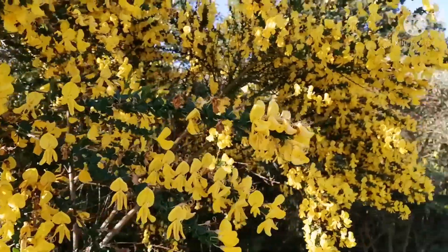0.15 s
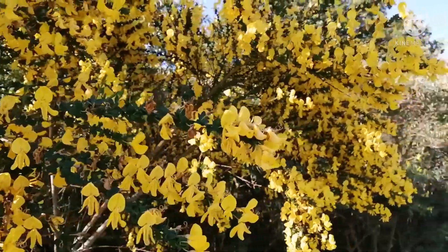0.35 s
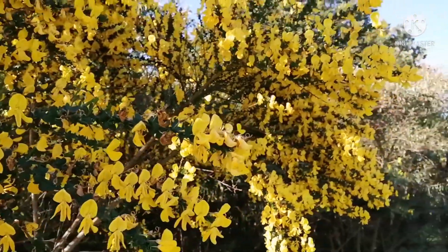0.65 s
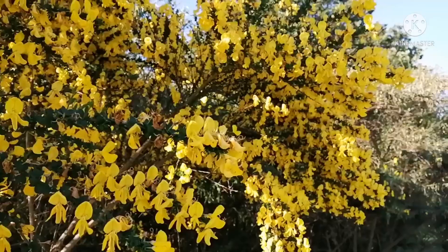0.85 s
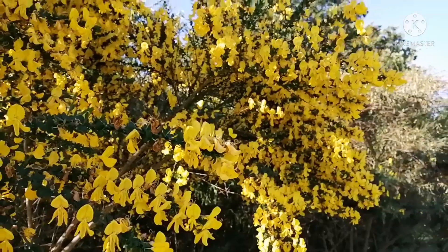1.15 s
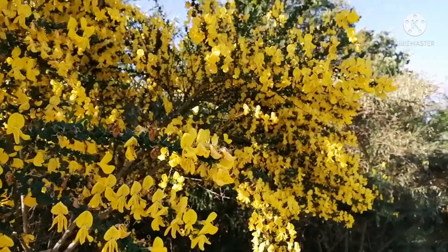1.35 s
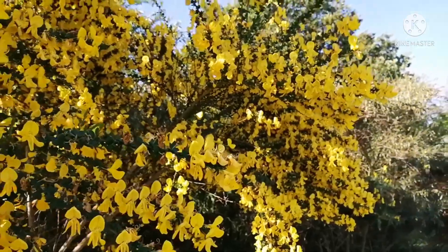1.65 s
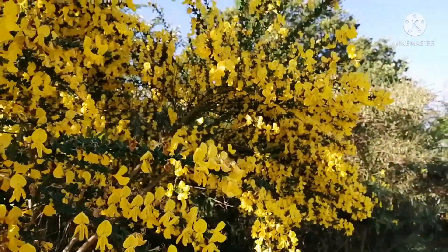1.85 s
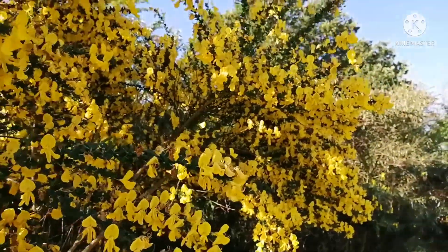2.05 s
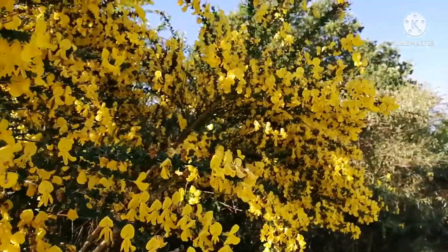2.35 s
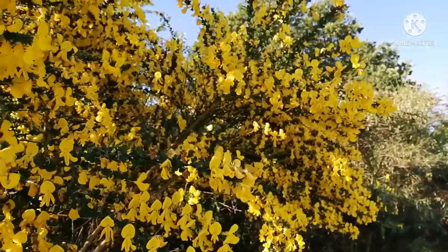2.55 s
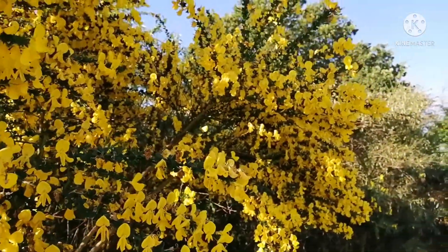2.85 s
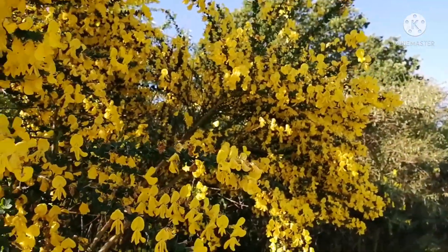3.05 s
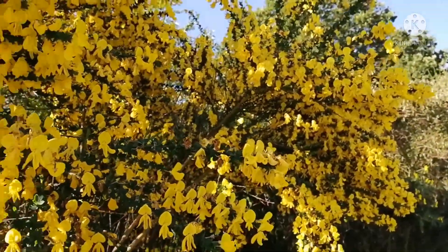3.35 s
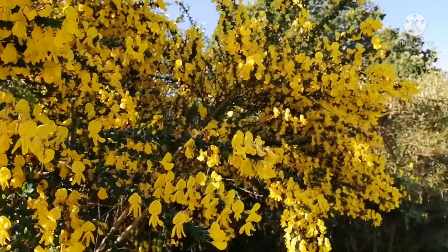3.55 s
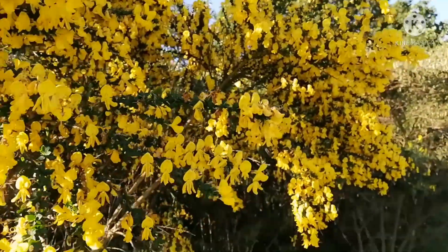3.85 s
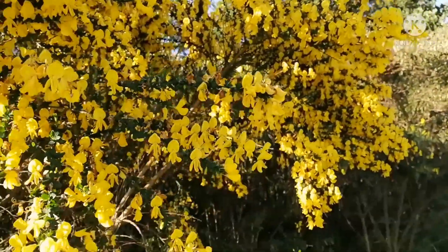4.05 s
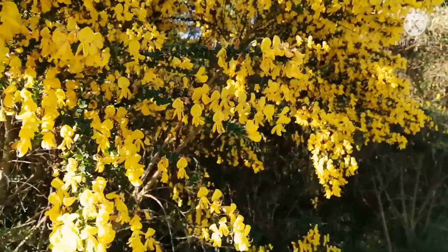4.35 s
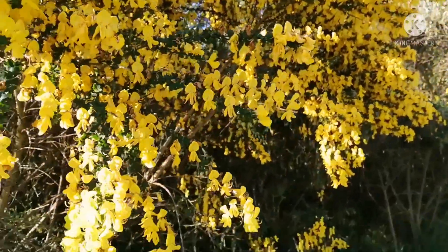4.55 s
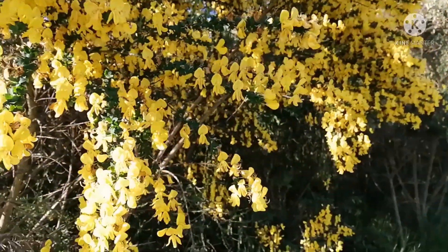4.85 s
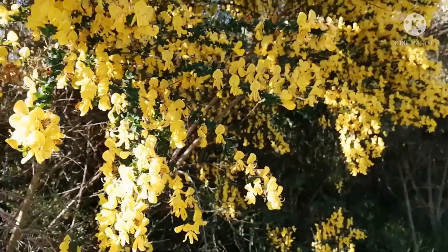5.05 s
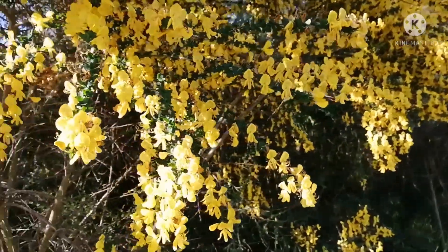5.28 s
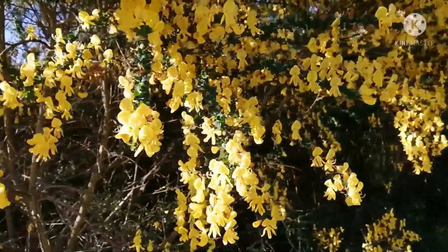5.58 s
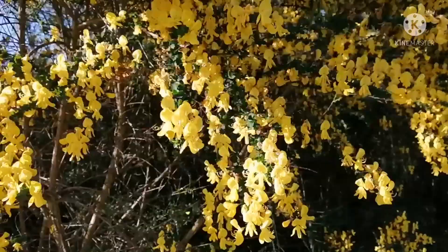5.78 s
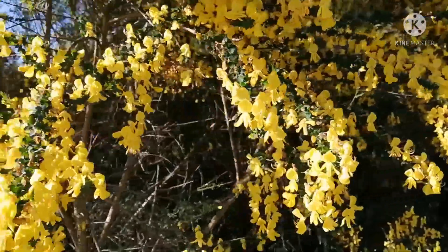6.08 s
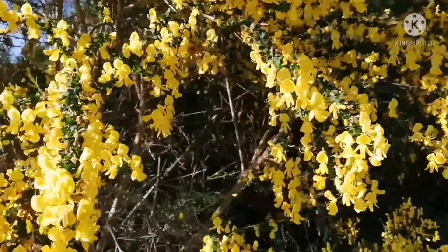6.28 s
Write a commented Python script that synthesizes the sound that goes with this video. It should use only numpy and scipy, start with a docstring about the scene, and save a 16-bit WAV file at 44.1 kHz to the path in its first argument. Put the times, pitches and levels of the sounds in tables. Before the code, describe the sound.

Near a flowering shrub, a bumblebee's smooth low drone surges and dips above distant machinery and traffic wash, with thin bird whistles and tiny twig ticks.

```python
"""Bee among flowering shrubs

A large bee's near-sine wingbeat hum swells, fades and slowly sinks. Wandering low tones and
shaped noise make far machinery, traffic, breeze and leaves. Small birds whistle in gliding sines
and rasp in trilled noise, also repeating a thin high note; a damped sine ticks as a twig thrice."""
import sys
import numpy as np
from scipy import signal
from scipy.fft import rfft, irfft
from scipy.io import wavfile

SR = 44100
rng = np.random.default_rng(int(sys.argv[2]) if len(sys.argv) > 2 else 0)


def transcribe(signal):
    """Save signal, clipped to [-1, 1], as a 16-bit WAV file at the path in sys.argv[1]."""
    frames = np.atleast_2d(signal).T
    limited = np.clip(frames, -1, 1)
    pcm = np.round(limited * 32767).astype(np.int16)
    wavfile.write(sys.argv[1], SR, pcm)


N = 283122
TIME = np.arange(N) / SR  # s


def gain_of(db):
    """Decibels to amplitude."""
    return 10 ** (np.asarray(db) / 20)


def evened(x):
    """Scales to rms 1."""
    return x / np.sqrt(np.mean(x ** 2) + 1e-20)


def curve(rows):
    """Joins (s, value) rows by straight lines."""
    return np.interp(TIME, *np.transpose(rows))


def progress(length_s):
    """Runs from 0 to 1 over a note."""
    return np.linspace(0, 1, int(length_s * SR))


def add(mix, start_s, sound):
    """Mixes a sound in at a start time."""
    part = mix[max(round(start_s * SR), 0):][:len(sound)]
    part += sound[:len(part)]


def noise(spectrum):
    """Noise of rms 1 with a (Hz, dB) spectrum, interpolated over log frequency."""
    hz, db = np.transpose(spectrum)
    bins_hz = np.fft.rfftfreq(N, 1 / SR)
    shape_db = np.interp(np.log(bins_hz + 1), np.log(hz + 1), db)
    white = rng.standard_normal(N)
    return evened(irfft(rfft(white) * gain_of(shape_db), N))


def drift(rate_hz):
    """Smooth chance of rms 1, no faster than about the given rate."""
    coarse = rng.standard_normal(4096)
    t = np.linspace(0, N / SR, len(coarse))
    bins_hz = np.fft.rfftfreq(len(t), t[1])
    smooth = irfft(rfft(coarse) * np.exp(-(bins_hz / rate_hz) ** 2))
    return np.interp(TIME, t, evened(smooth))


def hum_level():
    """The hum in dB: how near the bee is, less a smooth dip as it turns side-on."""
    # Each row: time in seconds, level in dB.
    nearness = [(0.0, -41), (0.19, -32), (0.88, -40.5), (1.21, -37), (1.42, -42.2), (2.43, -41.5),
                (3.24, -35.5), (3.78, -48.5), (4.31, -48.5), (4.57, -39.5), (4.96, -45.5), (5.12, -42.5),
                (5.77, -47), (6.34, -41.0)]
    # Each row: dip centre in seconds, half length in seconds, depth in dB.
    turns = [(0.74, 0.056, 5.5), (1.353, 0.031, 15), (1.885, 0.08, 5), (2.224, 0.028, 7), (2.68, 0.07, 5),
             (4.483, 0.066, 15), (4.757, 0.049, 13), (5.01, 0.059, 6), (5.515, 0.046, 6.5),
             (5.835, 0.17, 15)]
    level_db = curve(nearness)
    for centre_s, half_s, depth_db in turns:
        level_db -= depth_db * np.exp(-((TIME - centre_s) / half_s) ** 2)
    return level_db


def bee(jitter_hz=0.6, flutter_db=1.23, overtone_flutter_db=3):
    """Wing strokes push air almost as a sine beamed fore and aft; overtones spread and flicker."""
    # Wingbeat, sinking as the bee eases off. Each row: time in seconds, frequency in Hz.
    wingbeat = [(0, 190.1), (1.6, 189.2), (3.3, 187.1), (4.2, 184.9), (4.5, 182.2), (5.6, 183.7),
                (6.42, 182.3)]
    # Each row: multiple of the wingbeat, level in dB.
    overtones = [(2, -70.5), (3, -70), (4, -71), (5, -70), (6, -74)]
    beat_hz = curve(wingbeat) + jitter_hz * drift(12.9)
    phase = 2 * np.pi * np.cumsum(beat_hz) / SR
    wings = gain_of(hum_level() + flutter_db * drift(25)) * np.sin(phase)
    for multiple, db in overtones:
        gain = gain_of(db + overtone_flutter_db * drift(4.7))
        offset = 2 * np.pi * rng.random()
        wings += gain * np.sin(round(multiple) * phase + offset)
    return np.sqrt(2) * wings


def machinery(rumble_db=-47, waver_db=1.5):
    """Low wandering tones beat against each other and make the rumble throb."""
    # Each row: frequency in Hz, level in dB, wander in Hz.
    drone = [(48.5, -47, 0.85), (59.4, -47.5, 0.27), (89.9, -59, .6), (94, -60, .8), (120.5, -65, 0.28)]
    # Each row: frequency in Hz, relative level in dB per Hz.
    rumble = [(6, -24.5), (18, -7.5), (45, 2), (70, 1), (95, -0.5), (140, -6), (205, -7.5), (245, -15.5),
              (330, -23), (600, -51)]
    out = np.zeros(N)
    for hz, db, wander_hz in drone:
        cycles = np.cumsum(hz + wander_hz * drift(2.03)) / SR + rng.random()
        gain = np.sqrt(2) * gain_of(db + waver_db * drift(2.5))
        out += gain * np.sin(2 * np.pi * cycles)
    return out + gain_of(rumble_db) * noise(rumble)


def air(wash_db=-51.5, swell_db=0.53, rustle_db=3.0):
    """A steady far wash, tyre roar that recedes, and a breeze that rises and stirs the leaves."""
    # Spectra. Each row: frequency in Hz, relative level in dB per Hz.
    wash_spectrum = [(100, -15), (330, -8.5), (450, -2), (700, -1.5), (1000, -0.5), (1350, -8), (1900, -7),
                     (3000, -13.5), (3500, -21), (3900, -28), (4400, -24), (5200, -20), (6200, -21),
                     (7400, -30.5)]
    tyre_spectrum = [(500, -24), (780, -4), (930, 0.5), (1100, -3.5), (1400, -10), (1900, -13.5),
                     (3000, -34.5)]
    breeze_spectrum = [(15, -10.5), (45, 0.5), (90, 2.5), (130, -3.5), (200, -10), (330, -23), (450, -12.5),
                       (800, -13.5), (1200, -37)]
    leaf_spectrum = [(1200, -19), (2300, 2), (3200, -5), (4000, -7.5), (5200, -0.5), (7400, -10)]
    # Level curves. Each row: time in seconds, level in dB.
    tyre_level = [(0, -53.5), (1, -53), (2.1, -54), (3, -54.5), (3.8, -56), (4.4, -59.5), (5.3, -61),
                  (6.42, -60)]
    breeze_level = [(0, -62.5), (2.3, -64), (2.7, -48.5), (3.1, -61), (3.9, -60), (4.5, -50.5),
                    (5.1, -51.5), (5.8, -57.5), (6.42, -58.5)]
    leaf_level = [(0, -81), (3.9, -79), (4.4, -64.5), (5.1, -62.5), (5.6, -64.5), (6.42, -75)]
    wash = gain_of(wash_db + swell_db * drift(9.1)) * noise(wash_spectrum)
    tyres = gain_of(curve(tyre_level) + swell_db * drift(6)) * noise(tyre_spectrum)
    breeze = gain_of(curve(breeze_level)) * noise(breeze_spectrum)
    leaves = gain_of(curve(leaf_level) + rustle_db * drift(45)) * noise(leaf_spectrum)
    return wash + tyres + breeze + leaves


def puffs(rows):
    """Narrow bands of noise that each swell and fade."""
    out = np.zeros(N)
    for start_s, length_s, hz, width_hz, db in rows:
        hiss = rng.standard_normal(SR // 4)
        off = (np.fft.rfftfreq(len(hiss), 1 / SR) - hz) / width_hz
        band = irfft(rfft(hiss) * np.exp(-2 * off ** 2))[:int(length_s * SR)]
        add(out, start_s, gain_of(db) * evened(band * np.bartlett(len(band))))
    return out


def high_runs(note_s=0.11, rise_s=0.24, rise_db=10.5, scatter_hz=70):
    """Rows for puffs: one thin high note repeated evenly, growing louder at first."""
    # Each row: first note in seconds, last note in seconds, spacing in seconds,
    # centre in Hz, width in Hz, full level in dB.
    runs = [(3.6, 4.335, .105, 7200, 580, -62.5), (4.72, 5.325, .121, 6890, 800, -69)]
    notes = []
    for first_s, last_s, spacing_s, hz, width_hz, db in runs:
        for start_s in np.arange(first_s, last_s + spacing_s / 2, spacing_s):
            soft_db = rise_db * max(1 - (start_s - first_s) / rise_s, 0)
            note_hz = hz + scatter_hz * rng.standard_normal()
            notes.append((start_s, note_s, note_hz, width_hz, db - soft_db))
    return notes


def rasps(trill_hz=125, unsteady_hz=15, depth=0.2, ragged_db=2):
    """Hoarse bird notes and runs of a thin high note, chopped by a fast uneven trill."""
    # Each row: start in seconds, length in seconds, centre in Hz, width in Hz, level in dB.
    hoarse_notes = [(0.109, 0.13, 5340, 1220, -65), (0.219, 0.083, 5730, 2200, -61.5),
                    (0.398, 0.1, 5340, 690, -69.5), (1.72, 0.23, 5330, 1300, -68),
                    (2.923, .093, 5400, 890, -67), (3.044, .066, 5340, 1210, -65),
                    (3.171, .12, 5000, 800, -67.5), (3.2, .11, 6860, 700, -69),
                    (4.81, 0.13, 4586, 260, -64)]
    cycles = np.cumsum(trill_hz + unsteady_hz * drift(10)) / SR
    trill = 1 + depth * np.sin(2 * np.pi * cycles)
    chop = evened(trill) * gain_of(ragged_db * drift(70))
    return puffs(list(hoarse_notes) + high_runs()) * chop


def pips(arch=0.02):
    """Near-level whistles: gentle glides whose ends sag by a share (arch) of the pitch."""
    # Each row: start in seconds, length in seconds, pitch in Hz, fall in Hz, level in dB.
    pip_rows = [(.41, .06, 3110, 259, -60.5), (1.06, .02, 5700, 1, -63.5), (1.188, .025, 5730, 300, -63),
                (1.219, .045, 6480, -120, -61.5), (2.83, .083, 6460, -400, -62),
                (4.43, .035, 6980, 279, -60.5)]
    notes = []
    for start_s, length_s, hz, fall_hz, db in pip_rows:
        u = progress(length_s) - 0.5
        notes.append((start_s, hz * (1 - arch * (2 * u) ** 2) - fall_hz * u, db))
    return notes


def twitter(per_s=6, from_s=0.6, to_s=5.4, note_s=0.028, level_db=-68.5, uneven_db=2):
    """Far birds' short glides at chance moments, mostly falling."""
    centre_hz, spread_hz, fall_hz = 6270, 910, 600
    u, notes = progress(note_s), []
    for slot_s in np.arange(from_s, to_s, 1 / per_s):
        late, high, steep, loud = rng.uniform(-0.92, 1, 4)
        hz = centre_hz + spread_hz * high + fall_hz * (0.5 + steep) * (0.5 - u)
        notes.append((slot_s + late / per_s, hz, level_db + uneven_db * loud))
    return notes


def slurs(from_hz=7500, to_hz=5930, bend=0.93):
    """A small bird's falling whistles, each a little steeper at first."""
    # Each row: start in seconds, length in seconds, level in dB.
    slur_rows = [(0.668, .065, -67), (0.802, 0.073, -64), (1.615, .029, -63), (2.269, 0.027, -65),
                 (2.487, .026, -62.5), (2.678, .024, -58)]
    notes = []
    for start_s, length_s, db in slur_rows:
        notes.append((start_s, from_hz + (to_hz - from_hz) * progress(length_s) ** bend, db))
    return notes


def arches(foot_hz=2600, top_hz=3616):
    """A lower bird's chirps rise to a point and drop back."""
    # Each row: start in seconds, length in seconds, share of the note spent rising, level in dB.
    arch_rows = [(4.371, .056, .85, -62.5), (5.377, .052, 0.5, -55), (5.577, .05, .6, -59.5)]
    notes = []
    for start_s, length_s, rising, db in arch_rows:
        hz = np.interp(progress(length_s), [0, rising, 1], [foot_hz, top_hz, foot_hz])
        notes.append((start_s, hz, db))
    return notes


def chirps(waver=0.011):
    """Birds' near-sine whistles, smoothly gated, with a fast slight waver of pitch."""
    out, wobble = np.zeros(N), 1 + waver * drift(150)
    for start_s, hz, db in pips() + twitter() + slurs() + arches():
        note_hz = hz * wobble[int(start_s * SR):][:len(hz)]
        phase = 2 * np.pi * np.cumsum(note_hz) / SR
        envelope = np.sqrt(2) * gain_of(db) * signal.windows.tukey(len(hz), 0.7)
        add(out, start_s, envelope * np.sin(phase))
    return out


def shrubs(x, wet_db=-10, t60_s=0.97):
    """The foliage scatters a short, weak tail of decaying noise."""
    t = TIME[:SR // 2]
    tail = rng.standard_normal(len(t)) * gain_of(-60 * t / t60_s)
    return x + gain_of(wet_db) * signal.fftconvolve(x, tail / np.linalg.norm(tail))[:N]


def bump():
    """A soft low bump: a narrow band of noise that swells and fades."""
    # Each row: start in seconds, length in seconds, centre in Hz, width in Hz, level in dB.
    bump_rows = [(1.78, .11, 310, 70, -59)]
    return puffs(bump_rows)


def twig(ring_hz=6100, decay_s=0.00016):
    """A dry snap that rings for only a few cycles."""
    # Each row: time of envelope peak in seconds, peak level in dB.
    ticks = [(3.8036, -31), (3.859, -35), (4.0637, -27)]
    out, t = np.zeros(N), TIME[:SR // 100]
    envelope = t / decay_s * np.exp(1 - t / decay_s)
    snap = envelope * np.sin(2 * np.pi * ring_hz * t)
    for peak_s, db in ticks:
        add(out, peak_s - decay_s, gain_of(db) * snap)
    return out


def scene():
    """The bee in front, everything else behind it."""
    birds = shrubs(chirps() + rasps())
    return (bee() + machinery() + air() + birds + bump() + twig())[None]


def low_pass(x, hz):
    """A steep band limit."""
    taps = signal.firwin(301, hz, window=("kaiser", 8), fs=SR)
    return signal.oaconvolve(x, taps[None], "same")


def record(dry, edge_hz=7650, top_hz=15700, hiss_db=-92.5):
    """A narrow-band microphone channel, then the recorder's faint hiss and its own band limit."""
    hiss = gain_of(hiss_db) * rng.standard_normal(N)  # level ahead of the last band limit
    return low_pass(low_pass(dry, edge_hz) + hiss, top_hz)


dry = scene()
out = record(dry)
transcribe(out)
```